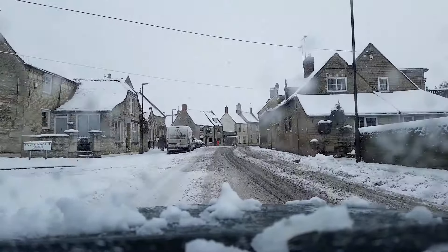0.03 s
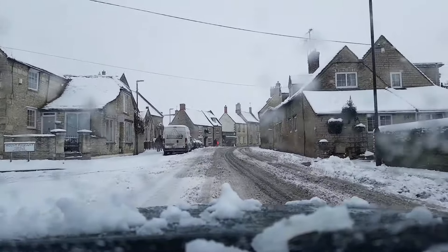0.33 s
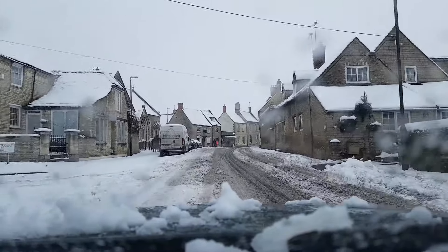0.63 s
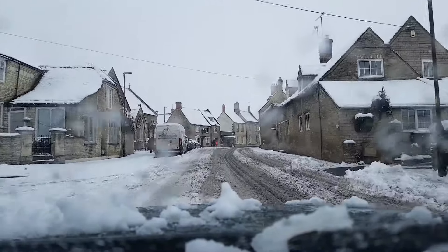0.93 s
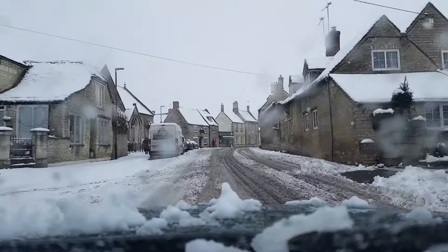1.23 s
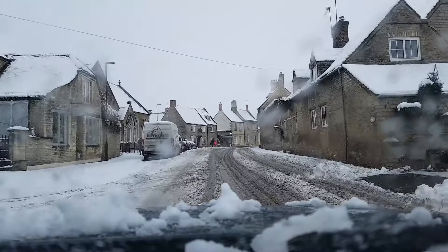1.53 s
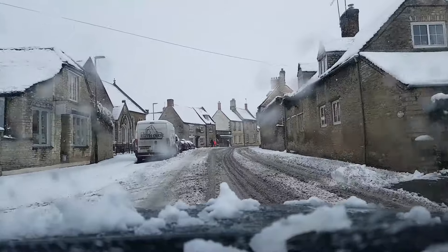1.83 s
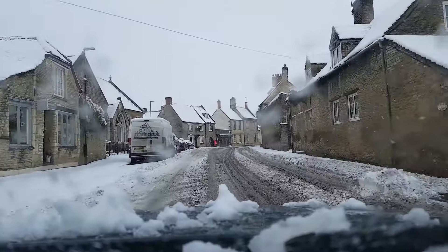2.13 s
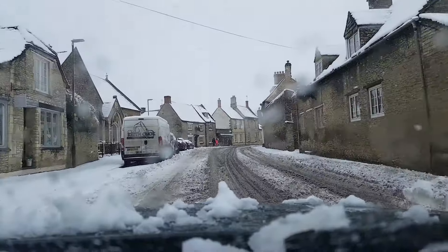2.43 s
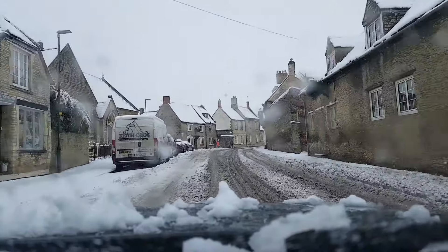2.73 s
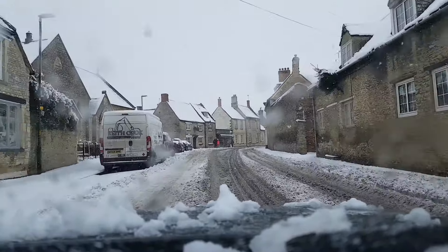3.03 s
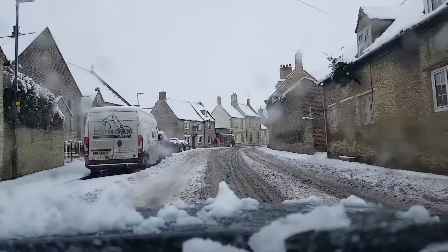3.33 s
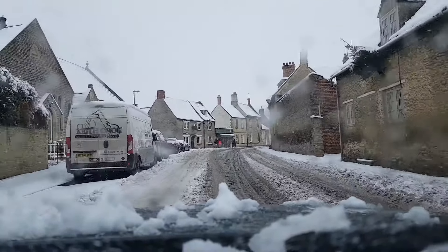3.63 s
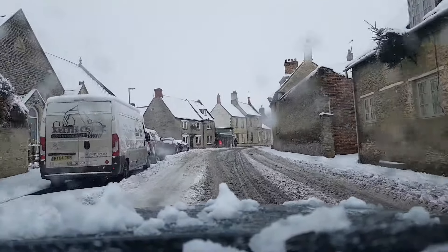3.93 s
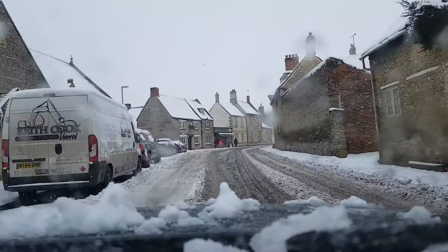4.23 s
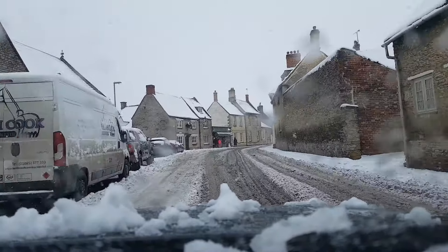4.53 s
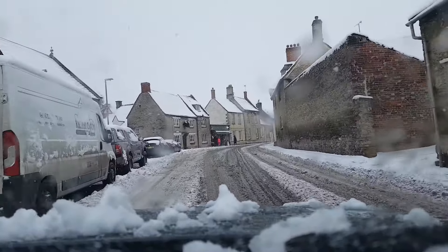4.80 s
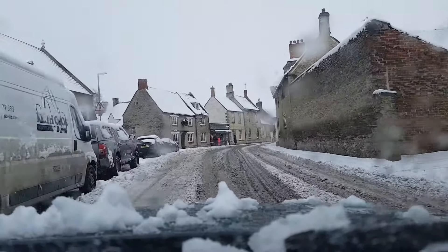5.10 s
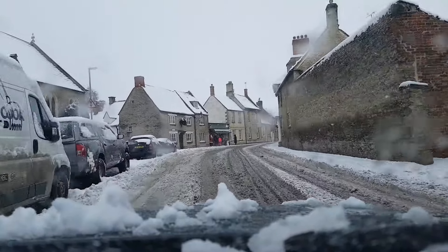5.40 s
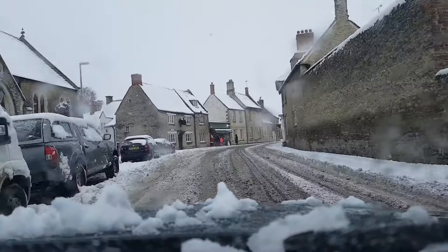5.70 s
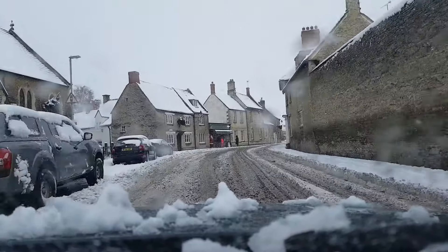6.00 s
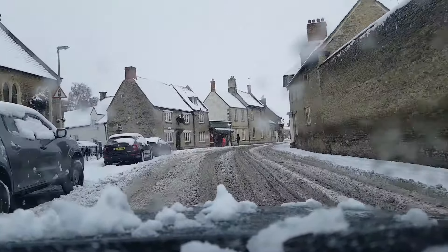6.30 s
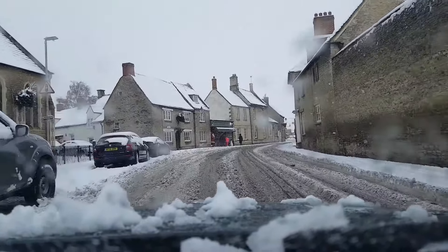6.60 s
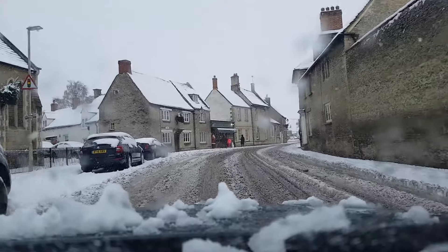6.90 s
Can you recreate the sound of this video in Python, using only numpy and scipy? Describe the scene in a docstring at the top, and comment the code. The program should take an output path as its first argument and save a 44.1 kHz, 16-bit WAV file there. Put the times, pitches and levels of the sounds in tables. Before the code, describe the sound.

Wind buffets the microphone from the start, a dull, fluttering rush over the low rumble of a slowly moving car and the faint hiss of tyres in slush. Small snaps and crackles of wind come on the left throughout. Soft, low thumps recur in the buffeting, first near 0.5 and 1.2 seconds. A wheel swishes faintly through wet snow at about 1 and 1.7 seconds, and an icy speck ticks sharply at 1.4, with fainter ticks later. The wind swells briefly into a hollow roar around 1.3, 2.8, 3.3, 4.2 and 6.5 seconds, and drops out for an instant near 1.7, 2.7, 3.8, 4.8 and 5.8. The crackling on the left is thickest from about 5.5 to 6.5 seconds. The tyre hiss lifts slightly near 6.8, and the wind is strongest at the end, just after 7 seconds.

```python
"""A car rolls slowly through a snowy village street, the microphone low over its bonnet in moving air.
From the start, turbulence buffets the two microphone ports over the car's rumble and the tyres' hiss.
At once eddies snap and crackle at the left port; then an icy speck ticks and the buffeting thumps.
After a second a wheel swishes through slush, the wind swells into a hollow roar, and later it drops
out for an instant. Each of these recurs, and the wind is strongest at the end, after seven seconds."""
import sys
import numpy as np
from scipy import signal
from scipy.fft import rfft, irfft, next_fast_len
from scipy.io import wavfile

SR = 44100
rng = np.random.default_rng(int(sys.argv[2]) if len(sys.argv) > 2 else 0)


def unload_wav(signal):
    """Save mono or channel-first audio to the path in sys.argv[1] as 16-bit WAV at rate SR, clipped to [-1, 1]."""
    wavfile.write(
        sys.argv[1],
        SR,
        np.round(np.clip(np.atleast_2d(signal).T, -1, 1) * 32767).astype(np.int16),
    )


N = 315315
T = np.arange(N) / SR


def undb(db):
    """The decibel scale: 20 dB is a factor of ten in amplitude."""
    return 10 ** (np.asarray(db) / 20)


def unit(x):
    """Normalisation to rms 1."""
    return x / np.sqrt(np.mean(x ** 2))


def curve(table):
    """Linear interpolation of (t, value) points at every sample."""
    return np.interp(T, *np.transpose(table))


def bumps_db(table):
    """Gains in dB add: a sum of brief, rounded level changes."""
    return sum(change_db * np.exp(-np.abs((T - s) / half) ** 3) for s, half, change_db in table)


def colour(x, points):
    """Spectral weighting by (f/Hz, level/dB) points joined on a log-frequency axis."""
    hz, db = np.transpose(points)
    size = next_fast_len(N + 8192)
    f = np.maximum(np.arange(size // 2 + 1) * SR / size, 1)
    gain = undb(np.interp(np.log(f), np.log(hz), db))
    return irfft(rfft(x, size) * gain, size)[:N]


def noise(spectrum):
    """Filtered white noise takes on the filter's spectrum; rms 1."""
    return unit(colour(rng.standard_normal(N), spectrum))


def walk(rate_hz):
    """Low-pass noise: a smooth random fluctuation of rms 1, up to about rate_hz."""
    f = np.arange(N // 2 + 1) * SR / N
    return unit(irfft(rfft(rng.standard_normal(N)) / np.sqrt(1 + (f / rate_hz) ** 4), N))


def ring(x, hz, width_hz):
    """Two resonators in cascade: gain 1 at the centre, steep sides."""
    b, a = signal.iirpeak(hz, hz / width_hz / np.sqrt(2), fs=SR)
    return signal.lfilter(b, a, signal.lfilter(b, a, x))


def hollow_roar(centre_hz=364, half_width_hz=52, wander=.07, wander_hz=6):
    """A resonance driven by turbulence gives a band of noise; its centre wanders at random."""
    phase = 2 * np.pi * np.cumsum(centre_hz * (1 + wander * walk(wander_hz))) / SR
    return unit(walk(half_width_hz) * np.cos(phase) + walk(half_width_hz) * np.sin(phase))


# relative spectra of the dull buffet, the small eddies and the rasp at the rim: f/Hz, level/dB
BUFFET_SPECTRUM = [(10, -25.5), (22, -27), (50, -22), (80, -10.5), (112, -5.5), (170, -4.5), (240, -4),
                   (365, -2), (490, -4), (650, -10.5), (1000, -25.5), (1500, -43), (3000, -74)]
EDDY_SPECTRUM = [(150, -26.5), (400, 0), (650, -1), (1000, -6), (1500, -18), (2000, -26), (3000, -42),
                 (6000, -76)]
RASP_SPECTRUM = [(400, -25), (1000, -9), (1600, 18.5), (2400, 5.5), (4000, -15), (8000, -50.5),
                 (15000, -50.5)]
# swells of the hollow resonance: t/s, half duration/s, level change/dB
ROAR_SWELLS = [(1.182, 0.02, 8.5), (1.27, 0.059, 9.5), (1.895, 0.014, 7.5), (2.125, 0.013, 11),
               (2.81, 0.08, 7.5), (3.31, 0.039, 8), (3.62, 0.029, 10), (4.052, .02, 2), (4.18, 0.036, 7),
               (4.68, 0.045, 5), (4.98, 0.017, 6.5), (5.203, 0.017, 8.5), (6.064, 0.015, 7.5),
               (6.13, 0.016, 7.5), (6.49, 0.075, 9.5), (6.975, 0.027, 8)]
def port_turbulence(swirl, flurry_db, rasp_db, rasp_burst_db, eddy_db=-7.5, roar_db=-8.5, burst_db=6.5):
    """Turbulent pressure at one port: a dull buffet, a hollow roar, bursts of small eddies, a rasp."""
    burst = 2 * np.tanh(walk(150) / 2)
    buffet = unit(noise(BUFFET_SPECTRUM) * undb(.5 * swirl + 3.0 * walk(60)))
    eddies = unit(noise(EDDY_SPECTRUM) * undb(1.2 * np.tanh(swirl) + burst_db * burst + flurry_db))
    roar = hollow_roar() * undb(roar_db + bumps_db(ROAR_SWELLS))
    pressure = unit(buffet + roar + undb(eddy_db) * eddies)
    # the flow tears at the rim as the square of the pressure, up to a limit
    tearing = np.minimum(np.abs(pressure), 3) ** 2
    rasp = unit(noise(RASP_SPECTRUM) * tearing * undb(rasp_burst_db * np.tanh(walk(260))))
    return pressure + undb(rasp_db) * rasp


# slow course of the airflow at the ports: t/s, level/dB
AIRFLOW = [(0.0, -12.5), (0.95, -12), (1.25, -12.5), (1.5, -12), (1.85, -12), (2.0, -14), (2.5, -14.5),
           (2.8, -12.5), (3.9, -12), (4.3, -12.5), (4.6, -11.5), (4.85, -14), (5.1, -12), (5.8, -12.5),
           (6.5, -12.8), (6.8, -12), (7.15, -9.5)]
# brief lulls in the airflow: t/s, half duration/s, level change/dB
LULLS = [(.527, .02, -1.5), (1.731, 0.012, -19), (1.986, 0.022, -1), (2.343, 0.0099, -7),
         (2.527, 0.017, -3), (2.731, 0.014, -8.5), (3.039, 0.015, -0.5), (3.26, 0.024, -4),
         (3.5, 0.069, -3), (3.78, 0.0084, -12), (4.1, .018, -1.5), (4.834, 0.015, -12.5),
         (4.906, 0.018, -4.5), (5.477, 0.016, -7), (5.75, 0.016, -10.5), (6.089, 0.0056, -11),
         (6.79, 0.036, -3.5)]
# flurries of small eddies, mainly at the left port: t/s, half duration/s, level change/dB
FLURRIES = [(.217, 0.013, 1), (1.622, 0.039, 3.5), (1.84, 0.033, 2), (2.93, 0.039, 0.5), (3.39, 0.054, 3.5),
            (4.165, 0.023, 6.5), (5.868, 0.012, 5), (6.28, .025, 6), (6.5, 0.027, 4.5), (6.71, .03, 4),
            (7.09, 0.033, 1)]
def wind(surge_db=0.22, surge_hz=12, veer_db=-0.24, veer_hz=7, left_bias_db=0.5):
    """Coherence depends on eddy size: swirls modulate both ports, fine turbulence is each port's own."""
    flow_db = curve(AIRFLOW) + surge_db * walk(surge_hz) + bumps_db(LULLS)
    pan_db = left_bias_db + veer_db * walk(veer_hz)
    swirl = walk(21)
    flurry_db = bumps_db(FLURRIES)
    left = port_turbulence(swirl, flurry_db, rasp_db=-27.5, rasp_burst_db=1.0)
    right = port_turbulence(swirl, 0.32 * flurry_db, rasp_db=-28.0, rasp_burst_db=5.0)
    return np.array([left, right]) * undb(flow_db + np.array([pan_db, -pan_db]) / 2)


# relative spectrum of the shaking car body: f/Hz, level/dB
RUMBLE_SPECTRUM = [(12, -19.5), (28, -12.5), (37, -0.5), (47, -13), (90, 0), (200, -10.5), (800, -38),
                   (3000, -65.5)]
def car_rumble(level_db=-39):
    """Forced vibration: engine and road shake the body, heard alike at both ports."""
    return undb(level_db) * noise(RUMBLE_SPECTRUM)


# relative spectrum of wet snow squeezed from a tread: f/Hz, level/dB
SLUSH_SPECTRUM = [(300, 2.5), (1500, 1.5), (2000, -10), (2800, -8.5), (3300, -3.5), (4100, -8.5),
                  (4900, -12), (5600, -13), (6400, -18.5), (7000, -19.5), (10000, -17), (12200, -21.5),
                  (15500, -28.5)]
def slush(spread_db=3.8, splashes_per_s=1800, splash_db=-10.5):
    """Shot noise: countless tiny, independent splashes of uneven size lie in a fine hiss."""
    splashes = (rng.random(N) < splashes_per_s / SR) * rng.standard_normal(N)
    splashes *= undb(spread_db * np.minimum(rng.exponential(size=N), 4))
    return unit(colour(rng.standard_normal(N) + undb(splash_db) * unit(splashes), SLUSH_SPECTRUM))


# tyre spray, louder where the slush is wetter: t/s, level/dB
SPRAY = [(0.0, -39), (0.85, -38), (1.08, -36.3), (1.35, -37.5), (1.55, -36.5), (1.8, -35.5), (1.92, -40.5),
         (2.6, -40), (2.74, -38), (3.2, -38.5), (3.8, -39), (5.5, -38.5), (6.5, -38), (6.8, -34.5),
         (7.1, -36)]
# resonances of the bodywork under the spray: f/Hz, bandwidth/Hz, relative level/dB
BODY_MODES = [(2394, 380, 0.5), (3140, 90, -5.5), (4710, 530, -10.5), (6090, 350, -11.5)]
def tyres(ring_db=-10, flutter_db=1.18, patter_db=0.5, port_lag_s=0.000454):
    """Diffuse and direct sound: spray hisses all round; its ring on the body reaches the left first."""
    body = unit(sum(undb(db) * ring(rng.standard_normal(N), hz, width) for hz, width, db in BODY_MODES))
    direct = np.array([body, np.interp(T - port_lag_s, T, body)])
    diffuse = np.array([slush(), slush()]) * undb(patter_db * walk(70))
    return unit(diffuse + undb(ring_db) * direct) * undb(curve(SPRAY) + flutter_db * walk(29))


# fine crackle at the left port: t/s, mean click rate/(1/s)
CRACKLE_RATE = [(0, 16), (2.0, 10), (2.8, 38), (4.3, 15), (5.5, 34), (5.8, 48), (6.25, 58), (6.45, 20),
                (7.15, 16)]
def crackle(centre_hz=1950, octaves=.55, level_db=-26.0, spread_db=6.0, candidates=500):
    """A random point process: tiny eddies arrive independently, as rows of t/s, level/dB, f/Hz."""
    per_s = curve(CRACKLE_RATE)
    clicks = []
    for when, size, pitch, chance in rng.random((candidates, 4)):
        if chance < per_s[int(when * N)] * T[-1] / candidates:
            hz = centre_hz * 2 ** (octaves * (2 * pitch - 1))
            # the quicker the pulse, the smaller it is
            peak_db = level_db + spread_db * (2 * size - 1) - 20 * np.log10(hz / centre_hz)
            clicks.append((when * T[-1], peak_db, hz))
    return clicks


# the hardest eddies at the left port: t/s, relative peak level/dB, pitch f/Hz
HARD_EDDIES = [(.034, -5, 770), (.868, -6, 900), (1.282, -9.5, 1380), (1.812, -10, 1400), (1.842, -9, 780),
               (1.854, -17, 1100), (2.105, -9.5, 880), (2.861, -9, 800), (2.926, -6, 704), (3.179, -7, 740),
               (3.441, -6.5, 790), (3.877, -10, 680), (4.050, -11, 900), (4.184, -7, 735),
               (4.268, -9.5, 1100), (4.649, -4.5, 885), (4.986, -11, 820), (5.036, -9, 660),
               (5.137, -16, 1400), (5.403, -11.5, 1400), (5.591, -7, 850), (5.802, -15, 1200),
               (5.828, -12, 1150), (5.865, -17, 900), (5.872, -14, 980), (5.904, -15, 880),
               (5.970, -15, 1250), (6.163, -17, 1500), (6.268, -11, 1100), (6.489, -10, 900),
               (6.626, -5, 875), (6.725, -7, 900), (6.926, -9, 900)]
def snaps(gain_db=1.0):
    """Time-frequency reciprocity: each eddy is one pressure spike, and the shorter, the brighter."""
    out = np.zeros((2, N))
    offsets = np.arange(-200, 200)
    for s, peak_db, hz in HARD_EDDIES + crackle():
        # a pointed pulse whose spectrum peaks at hz and falls off exponentially above
        pulse = ((1 - 1j * np.pi * hz * offsets / SR) ** -3).real
        out[0, np.clip(int(s * SR) + offsets, 0, N - 1)] += undb(peak_db + gain_db) * pulse
    return out


# icy specks striking the housing: t/s, left relative level/dB, right relative level/dB
SPECK_IMPACTS = [(.304, -33, -48), (1.423, -14.5, -12.5), (1.812, -22.5, -40), (2.925, -28, -54),
                 (2.988, -30, -50), (5.753, -29.5, -55), (5.827, -20, -42), (6.046, -24, -46),
                 (6.378, -30, -46)]
def specks(ring_hz=9000, decay_s=.00005, gain_db=3.0, push_db=-4, push_s=.0004):
    """Impulse response: each impact gives a sudden push and a bright, heavily damped oscillation."""
    out = np.zeros((2, N))
    age = np.arange(256) / SR
    oscillation = np.exp(-age / decay_s) * np.sin(2 * np.pi * ring_hz * age)
    push = undb(push_db) * np.exp(-age / push_s)
    tick = undb(gain_db) * (oscillation + push)
    for s, left_db, right_db in SPECK_IMPACTS:
        start = int(s * SR)
        # the tick meets the two ports with opposite signs
        out[:, start:start + len(tick)] += np.outer([undb(left_db), -undb(right_db)], tick)
    return out


def rushes(table, centre_hz, width_hz):
    """Amplitude modulation: Gaussian swells of one noise band, uncorrelated at the two ports."""
    swell = sum(undb(db) * np.exp(-((T - s) / half) ** 2) for s, half, db in table)
    return swell * np.array([unit(ring(rng.standard_normal(N), centre_hz, width_hz)) for _ in range(2)])


# low, dull thumps in the wind's buffeting: t/s, half duration/s, level/dB
LOW_THUMPS = [(.462, .04, -22.5), (1.213, .035, -20.5), (2.66, 0.04, -20), (3.29, .05, -21),
              (3.72, .035, -22), (5.055, 0.054, -20), (6.906, .035, -19.5)]
def thumps():
    """Envelope peaks: a brief swell in a low band of noise is heard as a dull thump."""
    return rushes(LOW_THUMPS, centre_hz=121, width_hz=120)


# slush flung up by a wheel: t/s, half duration/s, level/dB
SLUSH_THROWS = [(1.038, 0.039, -44.5), (1.68, 0.031, -37)]
def swishes(clump_db=11.0, clump_hz=140):
    """Random modulation: a broad rush of flung slush flutters as it breaks into clumps."""
    return rushes(SLUSH_THROWS, centre_hz=2000, width_hz=1600) * unit(undb(clump_db * walk(clump_hz)))


def scene():
    """Superposition: the pressures of wind, car and snow add at each port."""
    return wind() + car_rumble() + tyres() + snaps() + specks() + thumps() + swishes()


# frequency response of the ports: f/Hz, left level/dB, right level/dB
PORT_RESPONSE = [(25, 2.5, -6.5), (51.7, 4.5, -0.5), (109, 0.5, 1), (383, 0.5, 0.5), (1260, -0.95, -2.5),
                 (4400, -2.5, -1.5), (6600, -1, -3), (7400, -5, -0.5), (8100, -1.5, -4), (8900, 2, -7),
                 (9800, -6, -15.5), (12000, -2.5, -8), (13200, -2, -9.5), (15500, -4.5, -3)]
def record(dry, top_hz=15700):
    """Filtering and saturation: each port adds its colour, peaks are rounded and the top is cut."""
    ports = np.array(PORT_RESPONSE)
    heard = np.array([colour(dry[0], ports[:, [0, 1]]), colour(dry[1], ports[:, [0, 2]])])
    rounded = heard / (1 + heard ** 6) ** (1 / 6)
    return signal.sosfilt(signal.ellip(10, .1, 80, top_hz, fs=SR, output="sos"), rounded)


dry = scene()
out = record(dry)
unload_wav(out)
```